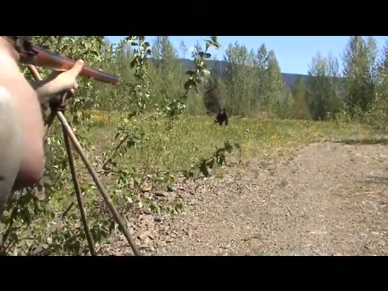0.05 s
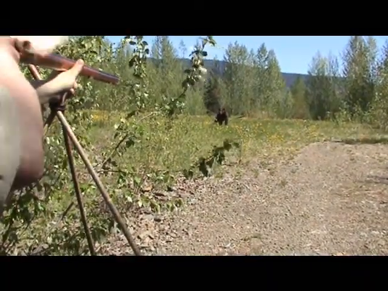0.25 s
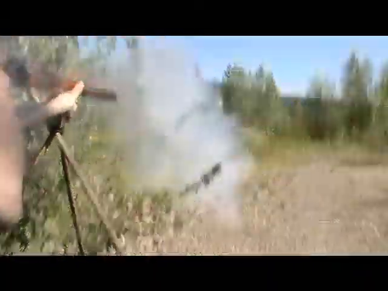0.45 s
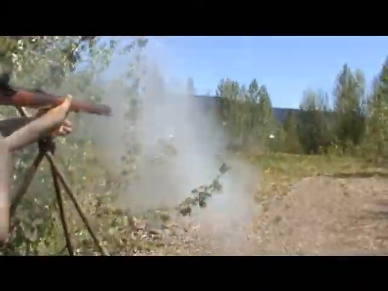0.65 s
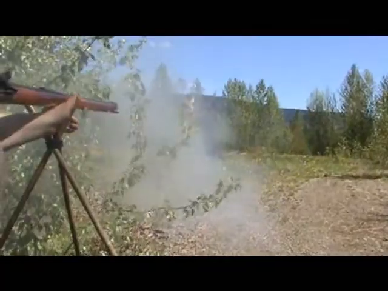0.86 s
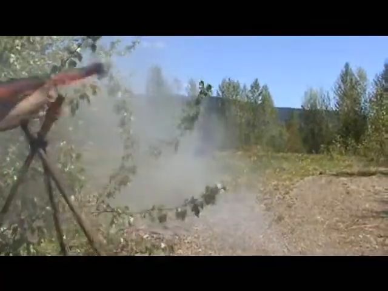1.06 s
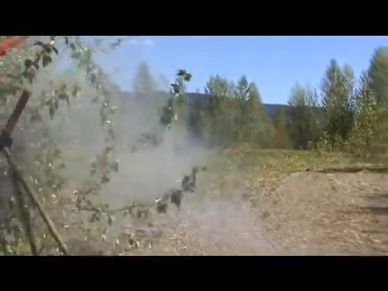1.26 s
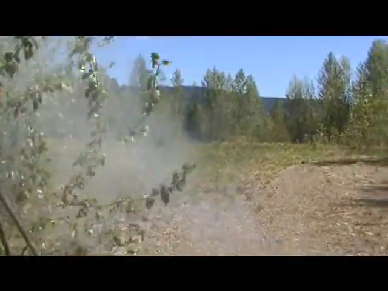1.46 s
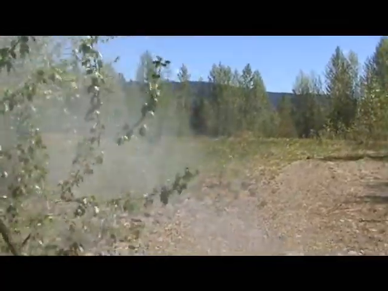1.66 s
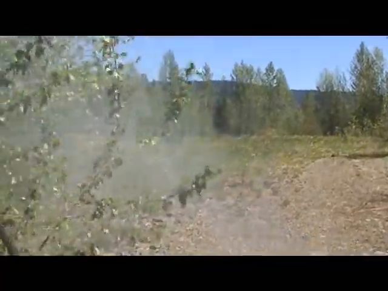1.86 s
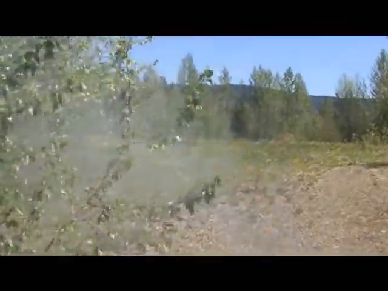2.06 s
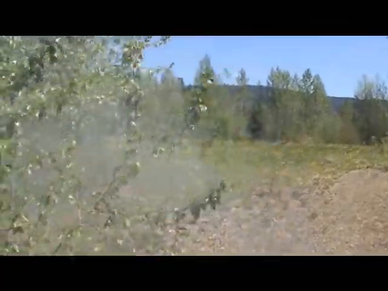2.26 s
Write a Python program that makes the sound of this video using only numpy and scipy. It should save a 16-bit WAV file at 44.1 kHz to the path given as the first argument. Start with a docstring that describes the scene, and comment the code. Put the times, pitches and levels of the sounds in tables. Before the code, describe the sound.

One flintlock muzzleloader shot outdoors: metallic crack, priming hiss, booming blast and fading tree-line echo.

```python
"""A flintlock rifle fires in a clearing ringed by trees, over an open-air floor and low wind.
First a bird warbles in gliding tones. The flint strikes: damped modes of steel and stock tick and rattle
while the priming fizzes and puffs as shaped noise. The blast is a short pressure pulse, then a dense echo
of noise from the tree lines, its treble fading faster than its bass.
Leaves and clothing rustle as swelling noise, with gear clicks and two soft knocks."""
import sys
import numpy as np
from scipy import signal
from scipy.io import wavfile
from scipy.ndimage import uniform_filter1d

SR = 44100
rng = np.random.default_rng(int(sys.argv[2]) if len(sys.argv) > 2 else 0)


def wrap_up_sound(samples):
    """Save the sound to the file named by the first command line argument, as 16-bit audio."""
    columns = np.atleast_2d(samples).T
    # keep every value between -1 and 1, then stretch to whole-number steps
    tamed = np.clip(columns, -1, 1)
    steps = np.round(tamed * 32767).astype(np.int16)
    wavfile.write(sys.argv[1], SR, steps)


N = 101429  # length in samples


def amp(db):
    """Level law: decibels to an amplitude ratio."""
    return 10 ** (np.asarray(db) / 20)


def even(x):
    """Normalisation to unit root-mean-square."""
    return x / np.sqrt(np.mean(x ** 2) + 1e-20)


def read(points, hz):
    """Spectrum interpolation along a logarithmic frequency axis."""
    f, value = np.transpose(points)
    return np.interp(np.log(hz + 1), np.log(f + 1), value)


def curve(rows, t, before_db=-120):
    """Envelope interpolation, linear in decibels over time."""
    time, level_db = np.transpose(rows)
    return np.interp(t, time, level_db, left=before_db)


def swell(start, length):
    """Half-sine envelope: a smooth rise and fall of amplitude."""
    return np.sin(np.pi * np.clip((np.arange(N) / SR - start) / length, 0, 1))


def add(mix, s, sound):
    """Superposition of a sound starting at s seconds, cut at the ends of the mix."""
    at = round(s * SR)
    part = mix[max(at, 0):][:len(sound) + min(at, 0)]
    part += sound[max(-at, 0):][:len(part)]


def rough(depth_db, size):
    """Amplitude modulation by smoothed noise: a fast random flutter of level."""
    flutter = signal.oaconvolve(rng.standard_normal(N), np.hanning(size) ** 2, "same")
    return even(amp(depth_db * even(flutter)))


def ring(modes):
    """Modal synthesis: one blow excites decaying sines, each up to 4 % off pitch; peak 1."""
    t = np.arange(1500) / SR
    x = np.zeros(len(t))
    for hz, db, t60 in modes:
        cycles = hz * rng.uniform(.96, 1.04) * t + rng.random()
        x += amp(db - 60 * t / t60) * np.sin(2 * np.pi * cycles)
    highpass = signal.butter(2, 500, "high", fs=SR, output="sos")
    x = signal.sosfilt(highpass, x * np.minimum(t / .0003, 1))  # 0.3 ms attack
    return x / abs(x).max()


# Likeness of left and right before scattering: f/Hz, coherence (0 to 1)
COHERENCE = [(60, 0.54), (300, 1), (2200, .73), (5300, 0.72), (9000, 0.97)]
# Phase by which the left leads: f/Hz, phase/rad
LEFT_LEAD = [(60, 0.74), (340, 0.8), (1600, 0.49), (5000, 0.09)]
LEFT_DB, LEAN_HZ = 2.2, 2500  # low-frequency excess of the left; it fades around LEAN_HZ


def noise(tone, field_db=None, patch_db=1, size=256, scatter_hz=0):
    """Short-time spectral synthesis of partly coherent stereo noise, with random level patches.

    The RMS is near 0.4 before field_db(hz, seconds); tables of level act on it as gains.
    """
    hop = size // 4
    frames, hz = N // hop + 5, np.fft.rfftfreq(size, 1 / SR)
    a, b, c, d, patches = rng.standard_normal((frames, len(hz), 5)).T
    patches = uniform_filter1d(patches, size=4, axis=0)
    patches = even(uniform_filter1d(patches, size=14, axis=1))
    # well below scatter_hz the two channels become unrelated
    coherence = np.clip(read(COHERENCE, hz) / (1 + (scatter_hz / (hz + 1)) ** 2), 0, 1)[:, None]
    left = a + 1j * b
    right = coherence * left + np.sqrt(1 - coherence ** 2) * (c + 1j * d)
    right = right * np.exp(-1j * read(LEFT_LEAD, hz))[:, None]
    lean = amp(LEFT_DB / 2 / (1 + (hz / LEAN_HZ) ** 2))[:, None]
    level = amp(read(tone, hz))[:, None]
    shift_db = patch_db * patches
    if field_db:
        shift_db = shift_db + field_db(hz[:, None], np.arange(frames) * hop / SR)
    gain = level / np.linalg.norm(level) * amp(shift_db)
    spectrum = np.array([left * lean, right / lean]) * gain
    return signal.istft(spectrum, nperseg=size, noverlap=size - hop)[1][:, :N] / 2


# Echo from the trees: t/s, level/dB
ECHO_LEVEL = [(.358, -15), (.44, -12.5), (.56, -14.5), (.62, -11), (.68, -13.5), (.73, -10.5), (.79, -15),
              (.88, -17), (1.04, -23.5), (1.12, -23), (1.19, -26.5), (1.38, -26), (1.7, -31.5), (2.3, -41)]
# Spectrum of the echo before treble loss: f/Hz, relative level/dB per Hz
ECHO_TONE = [(200, -16.5), (400, -2.5), (750, 4), (1900, -1), (3000, -3.5), (5700, -11.5), (8000, -16),
             (12500, -33), (13500, -63)]
# Treble lost on the way: t/s, loss at 8 kHz/dB (negative is a gain)
TREBLE_LOSS = [(.36, -15), (.45, -9), (.55, 1), (.62, 10.5), (.66, 9.5), (.8, 21.5), (1.0, 37), (1.4, 81)]
# Bass of the echo: t/s, level/dB
BASS_LEVEL = [(.358, -20), (.45, -26), (.55, -52), (.63, -24), (.68, -40), (.71, -32), (.8, -35.5),
              (.92, -51.5), (1.1, -55.5), (1.38, -42), (1.7, -48.5), (2.3, -56)]
# Spectrum of that bass: f/Hz, relative level/dB per Hz
BASS_TONE = [(25, -28), (130, 0), (350, -2), (600, -40)]
SHOT_S, SHOT_WIDTH_S = .3572, .00025  # onset; time until the pulse turns to suction
SHOT_DB = -7  # before the left and right gains
RISE_S = .002  # the echo fades in just before SHOT_S
LOSS_POWER = 1.297  # growth of the loss in dB with frequency
PATCH_DB, CRACKLE_DB = 1.4, .8
SCATTER_HZ = 570


def blast():
    """Blast-wave decay and frequency-dependent attenuation: a pulse, then its echo with separate bass."""
    t, pulse = np.arange(N) / SR, np.zeros(N)
    u = np.arange(600) / SR / SHOT_WIDTH_S
    add(pulse, SHOT_S, amp(SHOT_DB) * np.minimum(u * 3, 1) * (1 - u) * np.exp(-u))

    def treble_loss(hz, s):
        """Attenuation in decibels as a power of frequency."""
        return -curve(TREBLE_LOSS, s, TREBLE_LOSS[0][1]) * (hz / 8000) ** LOSS_POWER

    body = noise(ECHO_TONE, treble_loss, PATCH_DB, scatter_hz=SCATTER_HZ)
    body = body * rough(CRACKLE_DB, size=160) * amp(curve(ECHO_LEVEL, t, ECHO_LEVEL[0][1]))
    bass = noise(BASS_TONE, size=2048, scatter_hz=SCATTER_HZ)
    bass = bass * amp(curve(BASS_LEVEL, t, BASS_LEVEL[0][1]))
    rise = np.clip((t - SHOT_S) / RISE_S + 1, 0, 1)
    return pulse * amp([[2], [-10]]) + (body + bass) * rise  # pulse gains: left, right in dB


# Ticks of the lock: t/s, steel level/dB, stock level relative to steel/dB
TICKS = [(.2402, -22, 3), (.2417, -19, 5), (.2479, -15, -5), (.2571, -16, -4), (.2609, -21, -2),
         (.2632, -22, 0), (.2824, -15, -11), (.2993, -16, -9), (.3137, -15, -8), (.3258, -19, -9),
         (.3365, -21, -9), (.3443, -18, -10)]
# Modes of stock and plate: f/Hz, level/dB, t60/s
STOCK_MODES = [(800, -9, .008), (2100, 0, .009), (3300, -3, .007), (4400, -2, .006)]
# Modes of the steel cover: f/Hz, level/dB, t60/s
STEEL_MODES = [(6900, -3, .004), (7800, 0, .0045), (8900, -2, .003), (10800, -10, .0025)]
# Rebound and ground bounce of each tick: t after the listed time/s, relative level/dB
REPEATS = [(.0021, -4), (.0066, -9)]
# Fizz of the priming powder: t/s, level/dB
FIZZ_LEVEL = [(.2385, -33.5), (.266, -24.5), (.278, -39.5), (.296, -29), (.356, -24)]
# Spectrum of fizz and scrape: f/Hz, relative level/dB per Hz
FIZZ_TONE = [(150, -59), (500, -7.5), (1200, -8.5), (3300, -7), (5600, -18), (7800, -5.5), (11700, -17.5),
             (13500, -47)]
# Spectrum of the low puff as the priming lights: f/Hz, relative level/dB per Hz
PUFF_TONE = [(50, -14), (150, 0), (330, 0), (700, -22)]
TICK_DELAY_S = .0011  # from the listed time to the direct tick
SCRAPE_DB, SCRAPE_T60 = -14, .03  # relative to the tick; decay in s
FIZZ_FLUTTER_DB = 3.5
PUFF_S, PUFF_LENGTH_S, PUFF_DB = .296, .034, -29


def lock():
    """Impact excitation of damped modes, with scrape, fizz and puff as modulated noise."""
    ticks, scrape, t = np.zeros(N), np.zeros(N), np.arange(2000) / SR
    for s, db, stock_db in TICKS:
        for late, less_db in [(TICK_DELAY_S, 0)] + REPEATS:
            blow = ring(STEEL_MODES) + amp(stock_db) * ring(STOCK_MODES)
            add(ticks, s + late, amp(db + less_db) * blow)
        add(scrape, s, amp(db + SCRAPE_DB - 60 * t / SCRAPE_T60))
    time = np.arange(N) / SR
    fizz = rough(FIZZ_FLUTTER_DB, size=60) * amp(curve(FIZZ_LEVEL, time))
    fizz = fizz * (time < SHOT_S + RISE_S)
    hiss = noise(FIZZ_TONE) * (fizz + scrape)
    puff = noise(PUFF_TONE, size=1024) * amp(PUFF_DB) * swell(PUFF_S, PUFF_LENGTH_S)
    return ticks + hiss + puff


# Bird notes: start t/s, length/s, first f/Hz, last f/Hz, level before left and right gains/dB
NOTES = [(-.006, .029, 3000, 3950, -46), (.021, .012, 2850, 2950, -53), (.03, .029, 3000, 3900, -46),
         (.057, .012, 2800, 2900, -53), (.066, .032, 3050, 3500, -46), (.108, .022, 2300, 2500, -61),
         (.155, .024, 4050, 4950, -58), (.176, .026, 2900, 3700, -50), (.198, .05, 3650, 2450, -45)]
BIRD_WAVER = .012  # RMS share of the pitch
BIRD_ECHO_DB, BIRD_T60 = -1, .3  # leafy echo: level, decay in s
BIRD_LEFT_DB = 3  # left gain; the right has its negative


def bird():
    """Frequency modulation of short whistles, convolved with a decaying noise response for a leafy echo."""
    song = np.zeros(N)
    for s, length, a_hz, b_hz, db in NOTES:
        u = np.arange(0, 1, 1 / (length * SR))
        up = u if b_hz > a_hz else 1 - u
        high = (up + np.sin(np.pi / 2 * up)) / 2  # the glide rounds off at its top
        waver = BIRD_WAVER * even(uniform_filter1d(rng.standard_normal(len(u)), size=120))
        hz = (min(a_hz, b_hz) + abs(b_hz - a_hz) * high) * (1 + waver)
        whistle = np.sin(2 * np.pi * np.cumsum(hz) / SR)
        add(song, s, amp(db) * np.sqrt(np.sin(np.pi * u)) * whistle)
    t = np.arange(SR // 4) / SR
    tail = rng.standard_normal((2, len(t))) * amp(-60 * t / BIRD_T60)
    tail = tail / np.linalg.norm(tail[0])
    echo = amp(BIRD_ECHO_DB) * signal.fftconvolve(song[None], tail, axes=1)[:, :N]
    return (song + echo) * amp([[BIRD_LEFT_DB], [-BIRD_LEFT_DB]])


# Small clicks of gear: t/s, peak level/dB, pitch f/Hz
CLICKS = [(1.084, -43, 4000), (1.0948, -30, 3600), (1.126, -34, 3500), (1.397, -44, 4000),
          (1.907, -43, 1700), (1.9525, -37, 1700)]
# Modes of a click: multiple of the pitch, level/dB, t60/s
GEAR_MODES = [(1, 0, .008), (1.45, -8, .003), (2.1, -11, .004)]
# Knocks through the camera body: t/s, starting level/dB
THUMPS = [(1.9, -36.5), (1.983, -34.5)]
# Leaves and clothing: start t/s, length/s, level at the crest/dB
RUSTLE = [(1.066, 0.11, -45), (1.21, 0.34, -48.5), (1.777, 0.1, -60)]
# Spectrum of the rustle: f/Hz, relative level/dB per Hz
RUSTLE_TONE = [(1500, -5.5), (3500, -1.5), (7100, -11), (12500, -47)]


def handling():
    """Modal clicks, exponentially damped 90 Hz knocks and amplitude-modulated noise as rustle."""
    knocks, t = np.zeros(N), np.arange(2000) / SR
    for s, db, hz in CLICKS:
        modes = [(hz * multiple, mode_db, t60) for multiple, mode_db, t60 in GEAR_MODES]
        add(knocks, s, amp(db) * ring(modes))
    for s, db in THUMPS:
        add(knocks, s, amp(db - 60 * t / 0.025) * np.sin(-2 * np.pi * 90 * t))
    level = sum(amp(db) * swell(s, length) ** 2 for s, length, db in RUSTLE)
    return knocks + noise(RUSTLE_TONE) * rough(1.5, size=60) * level


# Spectrum of the open-air floor: f/Hz, relative level/dB per Hz
AIR_TONE = [(100, 8), (640, 0.5), (1500, -7.5), (8400, -15.5), (11500, -29.5), (13000, -57)]
# The floor dips slightly around the shot: t/s, level/dB
AIR_LEVEL = [(0, -47), (.35, -48.5), (.8, -48.5), (1.3, -47)]
# Wind on the microphone: t/s, level/dB
WIND_LEVEL = [(0, -54), (.11, -39), (.2, -59), (.45, -34.5), (.7, -60), (1.12, -55), (1.4, -57), (1.6, -64),
              (2.3, -55.5)]


def air():
    """Broadband ambient noise, plus low-frequency wind noise at the microphone."""
    wind_tone = [(20, -15), (60, -9.0), (150, -8), (300, -34.0), (600, -53)]  # f/Hz, dB per Hz
    t = np.arange(N) / SR
    wind = noise(wind_tone, size=2048, patch_db=-1.5) * amp(curve(WIND_LEVEL, t))
    floor = noise(AIR_TONE, size=512, patch_db=0) * amp(curve(AIR_LEVEL, t))
    return floor + wind


def scene():
    """Linear superposition of all sources."""
    return lock() + blast() + bird() + handling() + air()


LIMIT, EDGE_HZ = .7, 13690  # ceiling of the input stage (amplitude); upper band edge


def record(dry):
    """Saturation rounds off the loudest peaks in the input stage; a low-pass then limits the band."""
    soft = LIMIT * np.tanh(dry / LIMIT)
    lowpass = signal.firwin(511, EDGE_HZ, window=("kaiser", 9), fs=SR)
    return signal.oaconvolve(soft, lowpass[None], "same")


dry = scene()
out = record(dry)
wrap_up_sound(out)
```